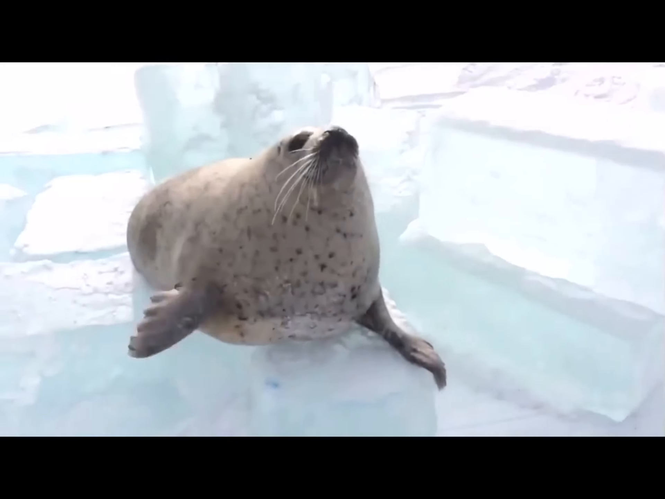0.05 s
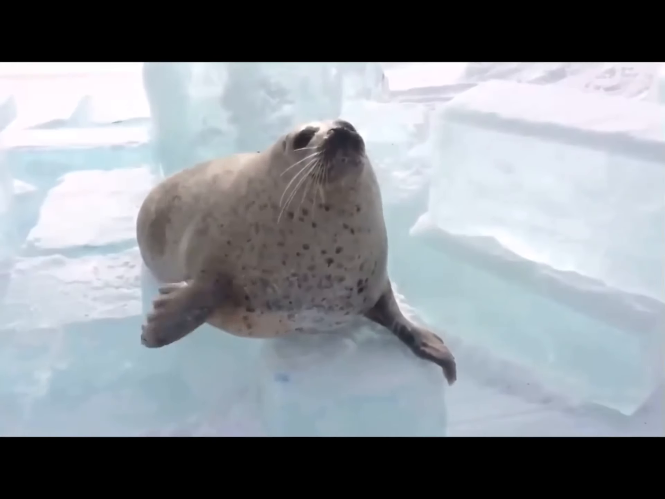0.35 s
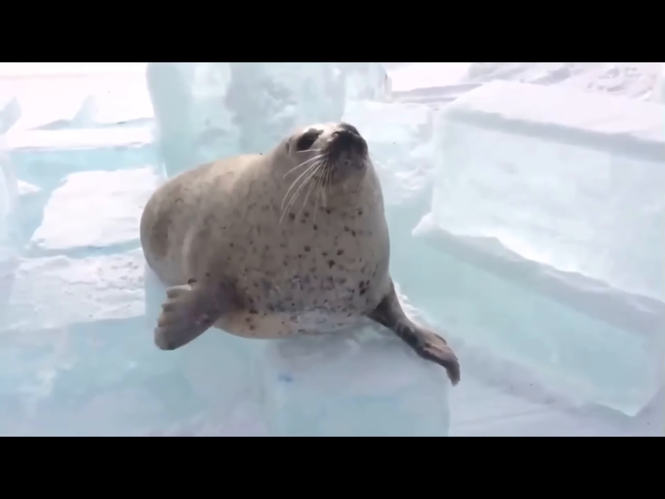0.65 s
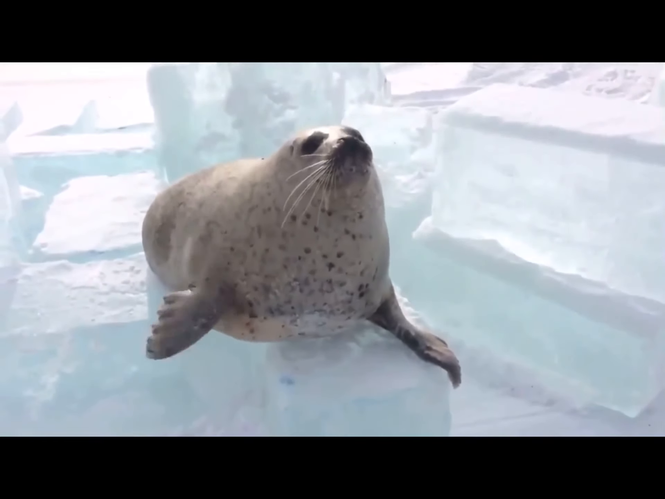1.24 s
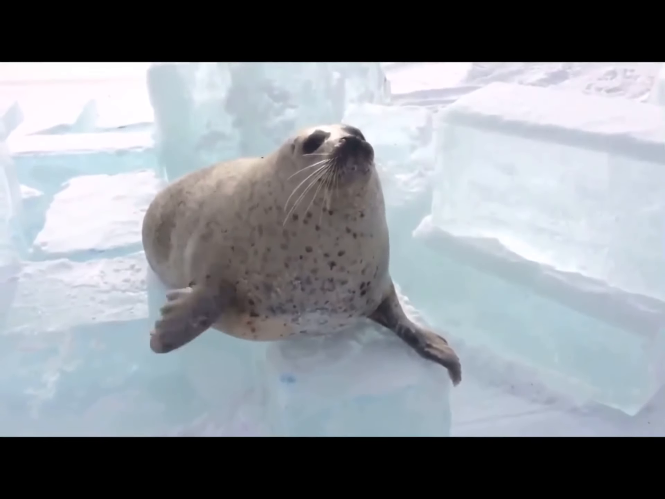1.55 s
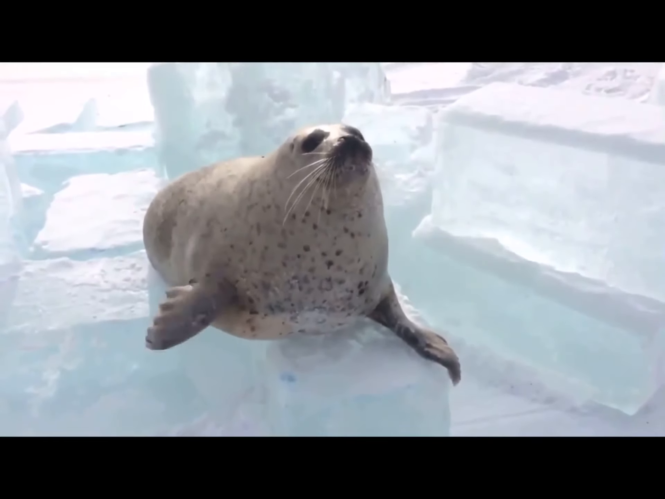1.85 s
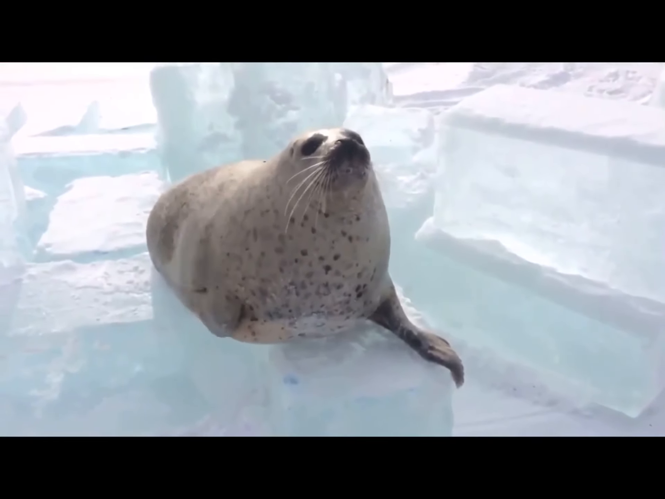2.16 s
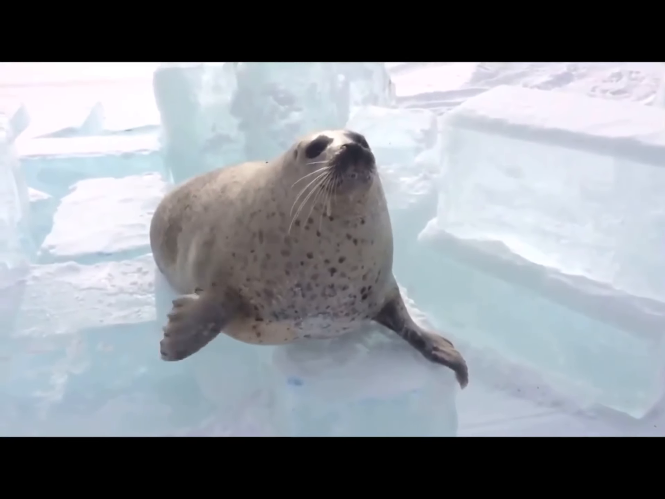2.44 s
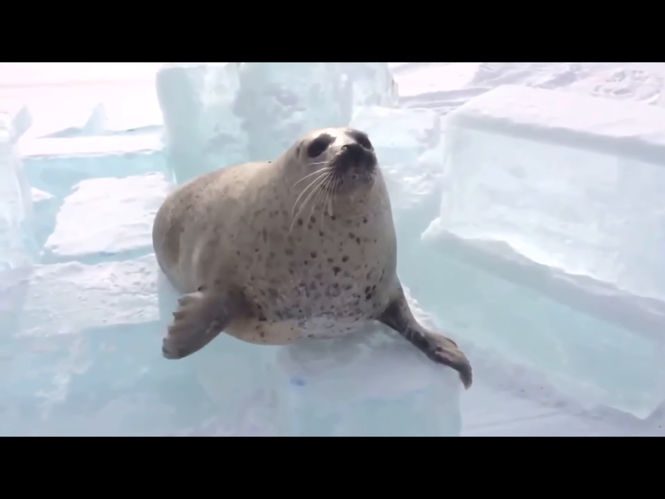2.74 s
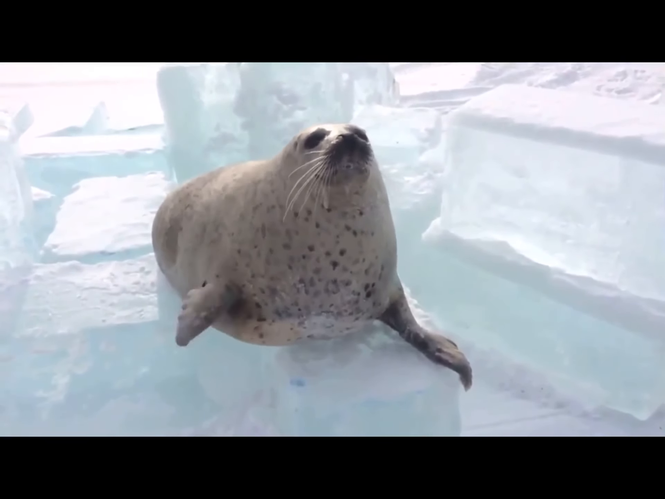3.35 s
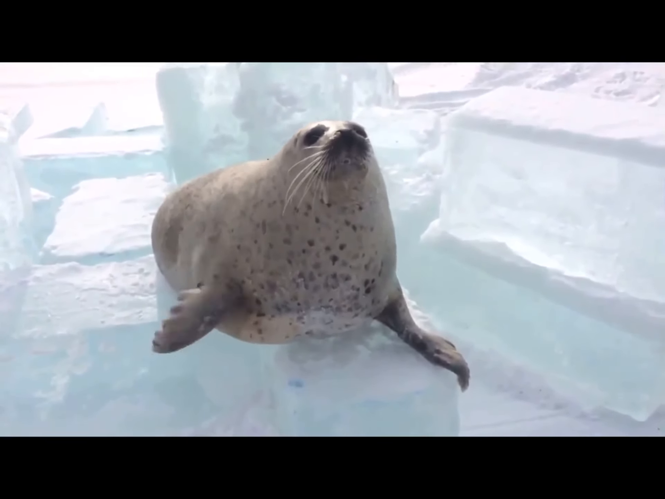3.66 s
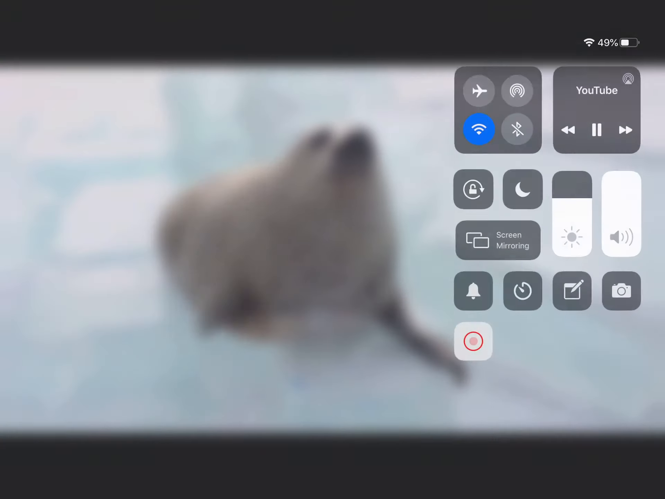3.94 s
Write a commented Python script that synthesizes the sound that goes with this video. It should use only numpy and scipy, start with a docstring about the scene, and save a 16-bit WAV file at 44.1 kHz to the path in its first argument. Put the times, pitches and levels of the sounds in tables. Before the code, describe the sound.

Fast, even, wet slaps run throughout as a seal beats its belly with a flipper, each a hollow smack with a slight spatter and a very short echo off ice. Faint outdoor hiss and soft wind bumps lie underneath.

```python
"""A seal lying on ice slaps its wet flipper against its belly, six to seven times a second.
Each slap is a hollow pop of trapped air, a thud of blubber, a smack of escaping air and a wet crack
with a little spatter. Ice blocks throw back a short echo. Light wind rumbles and bumps on the
microphone over a faint outdoor wash and two brief low hums."""
import sys
import numpy as np
from scipy import signal
from scipy.fft import rfft, irfft, next_fast_len
from scipy.io import wavfile
from scipy.ndimage import uniform_filter1d

SR = 44100
rng = np.random.default_rng(int(sys.argv[2]) if len(sys.argv) > 2 else 0)


def transcribe(signal):
    """Save signal, clipped to [-1, 1], as a 16-bit WAV file at the path in sys.argv[1]."""
    frames = np.atleast_2d(signal).T
    limited = np.clip(frames, -1, 1)
    pcm = np.round(limited * 32767).astype(np.int16)
    wavfile.write(sys.argv[1], SR, pcm)


N = 4 * SR


def amp(db):
    """Decibels to gain."""
    return 10 ** (np.asarray(db) / 20)


def unit_rms(x):
    """Scales to rms 1."""
    return x / np.sqrt(np.mean(x ** 2) + 1e-20)


def burst(x, db, window_s=0.01):
    """Scales a short sound to the energy of window_s at an rms of db."""
    return amp(db) * x / np.sqrt(np.sum(x ** 2) / (window_s * SR) + 1e-20)


def colour(x, points):
    """Minimum-phase filter through (Hz, dB) points: no pre-ringing."""
    size = next_fast_len(len(x) + 2048)
    hz, db = np.transpose(points)
    bins_hz = abs(np.fft.fftfreq(size, 1 / SR))
    log_gain = np.log(amp(np.interp(np.log(bins_hz + 1), np.log(hz), db)))
    response = np.exp(np.conj(signal.hilbert(log_gain)))
    return np.fft.ifft(np.fft.fft(x, size) * response).real[:len(x)]


def bell(x, hz, db, octaves):
    """Boosts or cuts one band."""
    grid_hz = np.geomspace(40, SR / 2, 300)
    gain_db = db * np.exp(-(np.log2(grid_hz / hz) / octaves) ** 2 / 2)
    return colour(x, np.c_[grid_hz, gain_db])


def cut(x, hz, kind, order=2):
    """Butterworth low-pass or high-pass."""
    return signal.sosfilt(signal.butter(order, hz, kind, fs=SR, output="sos"), x)


def peak(t, rise_s, fall_s):
    """Exponential rise to t = 0, then decay."""
    return np.exp(-np.where(t < 0, -t / rise_s, t / fall_s))


def drift(per_s):
    """Slow random wander, rms 1."""
    knots = rng.standard_normal(int(N / SR * per_s) + 2)
    return unit_rms(np.interp(np.arange(N) * per_s / SR, np.arange(len(knots)), knots))


def puff(envelope, smooth_bins):
    """Noise burst with a flattened spectrum."""
    spectrum = rfft(rng.standard_normal(len(envelope)) * envelope)
    power = uniform_filter1d(abs(spectrum) ** 2, smooth_bins)
    return unit_rms(irfft(spectrum / np.sqrt(power + 1e-12), len(envelope)))


def add(mix, start_s, sound):
    """Mixes a sound in at start_s."""
    part = mix[max(round(start_s * SR), 0):][:len(sound)]
    part += sound[:len(part)]


# Wash spectrum: (frequency [Hz], gain [dB])
WASH_SPECTRUM = [(15, -46), (40, 3), (100, 1), (300, 1.5), (450, -3), (680, 0.5), (900, -8), (1400, -7),
                 (2200, -13.5), (3500, -20.5), (6000, -24.5), (8000, -25), (12000, -30), (15000, -37)]
# Swell of the wash's treble: (time [s], gain [dB])
HISS_SWELL = [(0, 1.5), (.25, 2), (.45, 2), (.7, 3), (1.1, 1), (1.6, -2), (2.2, 0), (2.6, 2.5), (3.1, -0.5),
              (3.8, -1.5), (4, 2.5)]


def wash(level_db=-54, split_hz=900):
    """Faint outdoor noise whose hiss swells slowly."""
    noise = unit_rms(colour(rng.standard_normal(N), WASH_SPECTRUM))
    noise *= amp(level_db + 0.9 * drift(per_s=9.2))
    low = cut(noise, split_hz, "lowpass", order=1)
    hiss_db = np.interp(np.arange(N) / SR, *np.transpose(HISS_SWELL))
    return low + (noise - low) * amp(hiss_db)


# Wind spectrum: (frequency [Hz], gain [dB])
WIND_SPECTRUM = [(25, -30), (40, -9), (60, -5.5), (80, 1.5), (110, -7), (160, -10.5), (250, -20.5),
                 (700, -59.5)]
# Wind strength: (time [s], level [dB])
WIND_GUSTS = [(.35, -57), (.52, -45.5), (.96, -44.5), (1.25, -47.5), (1.55, -45), (1.8, -53), (2.1, -53),
              (2.4, -48), (2.7, -44), (2.95, -48.5), (3.25, -45), (3.45, -56.5), (3.8, -54.5), (4, -44)]


def wind():
    """Gusts rumble on the microphone."""
    level_db = np.interp(np.arange(N) / SR, *np.transpose(WIND_GUSTS)) + 0.98 * drift(per_s=10)
    return unit_rms(colour(rng.standard_normal(N), WIND_SPECTRUM)) * amp(level_db)


# Wind buffets: (centre time [s], envelope peak [dB])
BUFFETS = [(0.854, -36), (0.965, -30.5), (1.122, -34), (1.524, -36), (2.401, -30.5), (2.649, -33),
           (2.766, -39), (2.943, -34.5)]


def buffet(centre_s, db, hz=74, width_s=0.0054):
    """A puff of wind gives one soft, low bump."""
    t = np.arange(-0.05, 0.05, 1 / SR)
    envelope = amp(db) * np.exp(-(t / width_s) ** 2 / 2)
    return centre_s + t[0], envelope * np.cos(2 * np.pi * (hz * t + rng.random()))


# Low hums: (centre time [s], length [s], pitch [Hz], rms level [dB])
LOW_HUMS = [(1.47, 0.27, 174, -50), (3.2, 0.16, 223.5, -49.5)]


def hum(centre_s, length_s, hz, db):
    """A low wavering tone swells and fades."""
    count = int(length_s * SR)
    cycles = np.cumsum(hz * (1 + 0.036 * drift(per_s=59)[:count])) / SR
    tone = np.hanning(count) * np.sin(2 * np.pi * cycles)
    return centre_s - length_s / 2, amp(db) * unit_rms(tone)


# Ice-block scatter spectrum: (frequency [Hz], gain [dB])
SCATTER_SPECTRUM = [(100, 7.5), (300, -7.5), (550, -6.5), (750, -0.5), (1200, -6.5), (15000, -6.5)]
# Near ring spectrum, before its low-pass: (frequency [Hz], gain [dB])
NEAR_SPECTRUM = [(150, 4), (550, -3.5), (2000, 2.5)]


def ice_echo(dry, bounce_s=0.005272, onset_s=0.009, hold_s=0.034, far_t60_s=0.13, near_t60_s=0.042):
    """Adds faint scatter from the ice blocks, a dull near ring and one bounce off the ice below."""
    t = np.arange(len(dry)) / SR
    far, near = rng.standard_normal((2, len(t))) * (t > onset_s)
    far *= amp(-60 * np.maximum(t - hold_s, 0) / far_t60_s)
    near *= amp(-60 * t / near_t60_s)
    echo = amp(-24) * colour(far / np.linalg.norm(far), SCATTER_SPECTRUM)
    echo += amp(-19) * cut(colour(near / np.linalg.norm(near), NEAR_SPECTRUM), 1950, "lowpass")
    echo += amp(-18) * cut(np.sinc((t - bounce_s) * SR), 1100, "lowpass", order=1)
    return dry + signal.fftconvolve(dry, echo)[:len(dry)]


# Water spray spectrum: (frequency [Hz], gain [dB])
SPRAY_SPECTRUM = [(600, -1), (1500, 7), (3000, 4.5), (8000, 3.5), (11000, 1), (15000, -1)]


def spatter(envelope, grain_db=4):
    """Grainy hiss of water squeezed out of the fur."""
    flicker = unit_rms(uniform_filter1d(rng.standard_normal(len(envelope)), size=12))
    grains = rng.standard_normal(len(envelope)) * amp(-grain_db * flicker)
    return colour(grains * envelope, SPRAY_SPECTRUM)


def mist(t, life_s=0.056):
    """Fine droplets hiss on briefly after a slap."""
    hiss = spatter((t > 0) * np.exp(-(t / life_s) ** 4))
    return burst(cut(hiss, 5000, "highpass"), db=-55.5)


# Skin crack spectrum: (frequency [Hz], gain [dB])
CRACK_SPECTRUM = [(100, -58), (900, -15.5), (2000, -4), (3000, 1), (8000, 4.5), (11000, 0), (15000, -4.5)]
CRACK_RISE_S, CRACK_FALL_S = 0.00056, 0.001


def crack(t, hz, snap_share=0.6):
    """Wet skin closes on wet skin: one snap inside a millisecond of fizz, boosted at hz."""
    fizz = puff(peak(t, CRACK_RISE_S, CRACK_FALL_S), smooth_bins=400)
    snap = unit_rms(signal.unit_impulse(len(t), np.argmin(abs(t))))
    contact = np.sqrt(snap_share) * snap + np.sqrt(1 - snap_share) * fizz
    return bell(colour(contact, CRACK_SPECTRUM), hz, db=8.5, octaves=0.17)


# Escaping air spectrum: (frequency [Hz], gain [dB])
SMACK_SPECTRUM = [(100, -39.5), (500, -11.5), (800, 8), (1400, 2.5), (2400, 0.5), (4000, -11),
                  (16000, -38.5)]


def smack(t, hz):
    """Air squirts out at the flipper's edge and rings a small gap."""
    air = puff(peak(t, rise_s=0.0011, fall_s=0.0014), smooth_bins=80)
    return bell(colour(air, SMACK_SPECTRUM), hz, db=7, octaves=0.15)


def thud(t, hz=181, rise_s=0.0035, fall_s=0.0013):
    """The blubber gives way: one low push."""
    envelope = np.where(t < 0, np.exp(-(t / rise_s) ** 2 / 2), np.exp(-np.abs(t) / fall_s))
    return envelope * np.cos(2 * np.pi * hz * t)


# Air pocket modes: (frequency / pop pitch [ratio], gain [dB], t60 [s])
POCKET_MODES = [(.985, 1.5, 0.019), (.66, -12, 0.024), (1.45, -20, 0.042)]
# Pop filter: (frequency [Hz], gain [dB])
POP_SPECTRUM = [(100, -23), (200, -3.5), (265, -7), (315, 3), (650, 0), (900, -7)]


def pop(t, hz, lead_s=0.00017, rise_s=0.000074, life_s=0.0087):
    """Air trapped under the cupped flipper rings a few cycles until the pocket is squeezed shut."""
    age_s = np.maximum(t + lead_s, 0)
    stretch = np.exp(0.025 * rng.standard_normal())
    ring = sum(amp(db - 60 * age_s / (t60_s * stretch)) * np.cos(2 * np.pi * hz * ratio * t)
               for ratio, db, t60_s in POCKET_MODES)
    ring = bell(ring, 1.39 * hz, db=-2, octaves=0.2)  # steeper fall-off above the pitch
    attack = np.minimum(age_s / rise_s, 1)
    closing = np.exp(-(age_s / life_s) ** 4)
    return cut(closing * colour(ring * attack, POP_SPECTRUM), 61.5, "highpass", order=1)


# Flipper slaps, levels before the trims and dip in slap(): (time [s], pop level [dB], pop pitch [Hz],
# thud level [dB], smack level [dB], smack band [Hz], crack level [dB], crack band [Hz], dip band [Hz])
FLIPPER_SLAPS = [(.131, -21, 535, -31.5, -26, 1170, -29, 5400, 3660),
                 (.2825, -17.5, 565, -41, -28, 1180, -27, 2550, 1680),
                 (0.435, -22, 610, -28, -26.5, 840, -31, 6470, 4240),
                 (0.5834, -24.5, 355, -19.5, -27.5, 990, -31, 9700, 670),
                 (0.7321, -18.5, 525, -19.5, -25.5, 1380, -24.5, 3600, 1030),
                 (0.8815, -20.5, 548, -24.5, -26, 1300, -26.5, 3280, 1970),
                 (1.0289, -20, 530, -21.5, -28, 1500, -28.5, 5900, 900),
                 (1.1798, -20.5, 534, -26.5, -34.5, 1130, -25.5, 9100, 1610),
                 (1.3284, -16.5, 537, -27, -28.5, 1560, -33.5, 9600, 2250),
                 (1.4772, -14.5, 510, -33, -28.5, 1270, -28.5, 4800, 1100),
                 (1.6335, -15, 524, -39, -27, 1100, -29, 5100, 1330),
                 (1.7846, -23, 535, -26, -27.5, 1450, -24.5, 4550, 810),
                 (1.9338, -20, 514, -20, -24, 1420, -24.5, 3060, 4180),
                 (2.083, -21, 558, -27, -27, 2320, -27.5, 2580, 840),
                 (2.2344, -19.5, 510, -20.5, -28, 1190, -26, 7160, 2000),
                 (2.382, -21.5, 510, -27.5, -30.5, 1010, -27.5, 5400, 2820),
                 (2.5273, -22.5, 546, -22.5, -24.5, 1310, -26, 2440, 1365),
                 (2.677, -19, 512, -21.5, -24, 1210, -23.5, 2660, 1370),
                 (2.831, -16.5, 580, -40, -24.5, 1320, -33.5, 3100, 4030),
                 (2.982, -19, 558, -37, -25.5, 1330, -34, 5800, 3300),
                 (3.1334, -18.5, 550, -51, -28, 1190, -31, 4600, 2060),
                 (3.2905, -17.5, 567, -29, -24, 1590, -28.5, 2900, 2080),
                 (3.451, -14.5, 555, -40, -26, 790, -33, 2410, 6300),
                 (3.6119, -14.5, 550, -38, -29, 1410, -28.5, 3200, 1900),
                 (3.771, -23, 580, -23.5, -25.5, 1065, -24.5, 2950, 840),
                 (3.9247, -17.5, 543, -29.5, -26, 1470, -32, 3300, 2210)]


def slap(time_s, pop_db, pop_hz, thud_db, smack_db, smack_hz, crack_db, crack_hz, dip_hz):
    """The flipper's edge touches, the flat lands, water sprays; each landing leaves one band hollow."""
    t = np.arange(-0.02, 0.2, 1 / SR)
    landing = burst(pop(t, pop_hz), pop_db)
    landing += burst(thud(t), thud_db - 6)
    landing += burst(smack(t, smack_hz), smack_db + 0.5)
    landing += burst(crack(t, crack_hz), crack_db)
    landing = bell(landing, dip_hz, db=-9, octaves=0.14)
    touch_envelope = peak(t, rise_s=0.003, fall_s=CRACK_FALL_S) * (t > -0.006)
    touch = burst(spatter(touch_envelope), 0.8 * thud_db - 14)  # flatter landing, wetter first touch
    spray = burst(spatter(peak(t, CRACK_RISE_S, fall_s=0.0062)), crack_db - 7)
    return time_s + t[0], ice_echo(landing + touch + spray) + mist(t)


def scene():
    """Slaps over the outdoor background, mono."""
    mix = cut(wash() + wind(), 36, "highpass", order=3)
    for source, table in ((slap, FLIPPER_SLAPS), (buffet, BUFFETS), (hum, LOW_HUMS)):
        for row in table:
            add(mix, *source(*row))
    return mix[None]


def record(dry, ceiling=0.73, edge_hz=15400):
    """Soft peak limiting, then a low-pass."""
    limited = dry / (1 + (dry / ceiling) ** 4) ** (1 / 4)
    lowpass = signal.firwin(255, edge_hz, window=("kaiser", 8), fs=SR)
    return signal.oaconvolve(limited, lowpass[None], "same")


dry = scene()
out = record(dry)
transcribe(out)
```